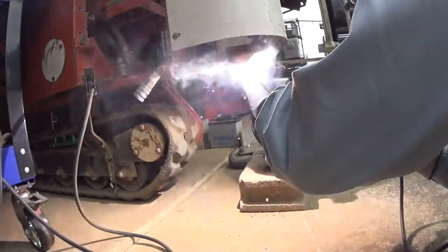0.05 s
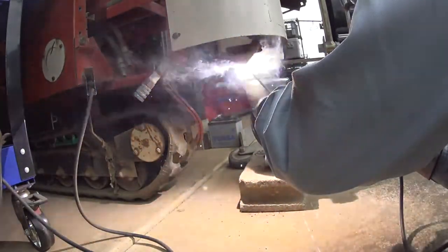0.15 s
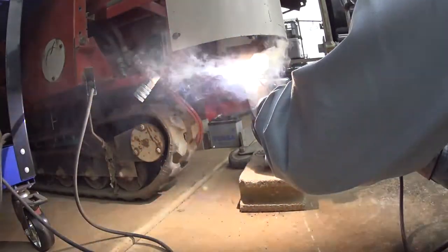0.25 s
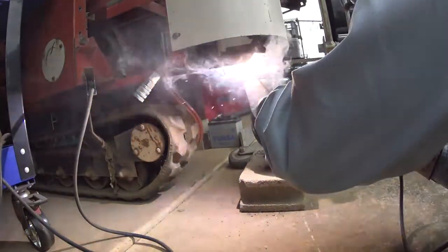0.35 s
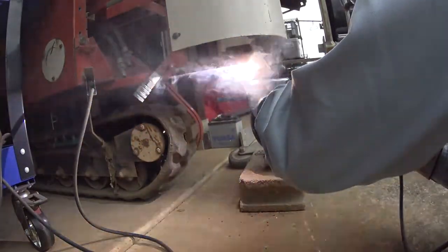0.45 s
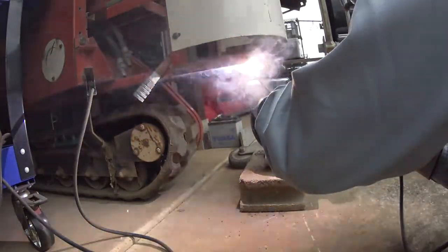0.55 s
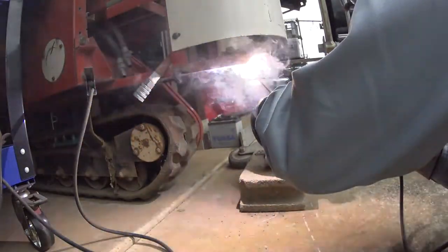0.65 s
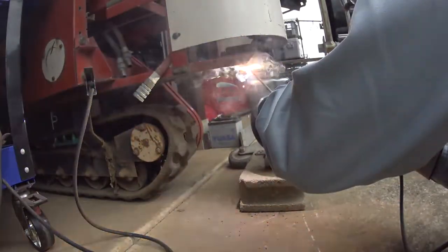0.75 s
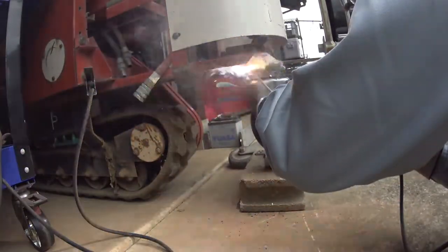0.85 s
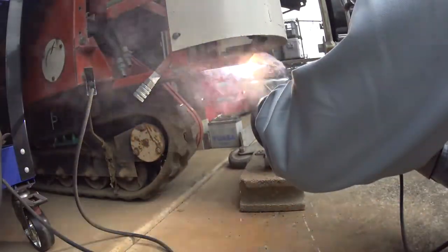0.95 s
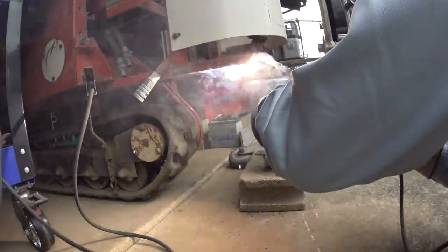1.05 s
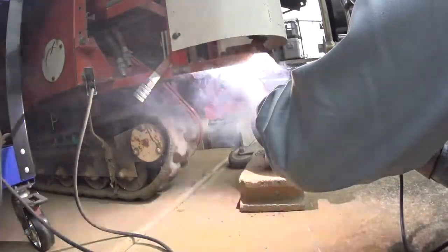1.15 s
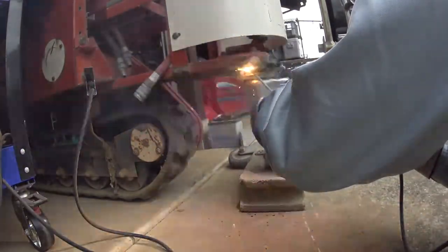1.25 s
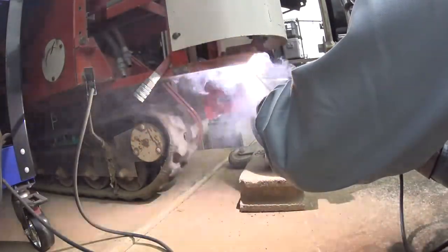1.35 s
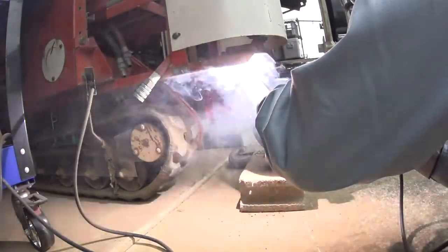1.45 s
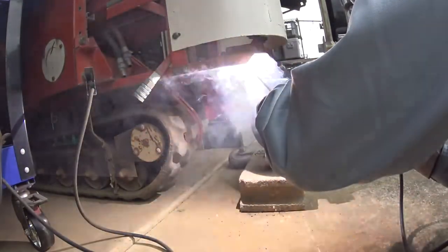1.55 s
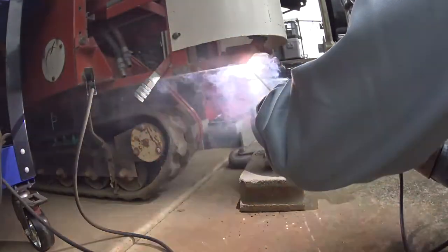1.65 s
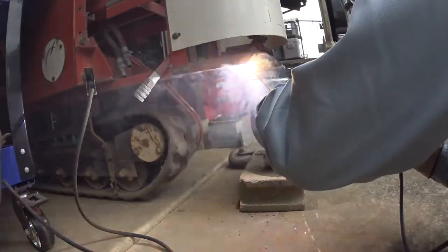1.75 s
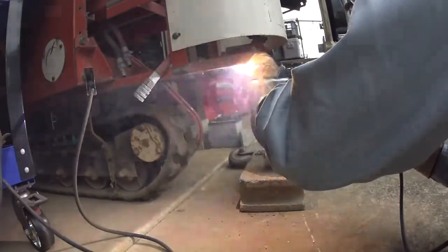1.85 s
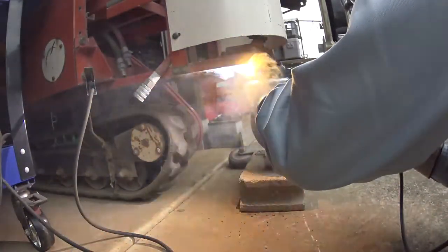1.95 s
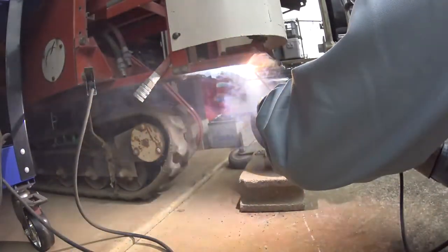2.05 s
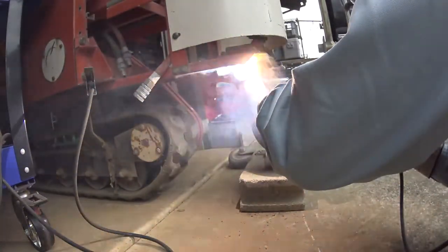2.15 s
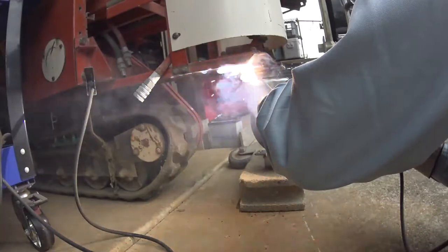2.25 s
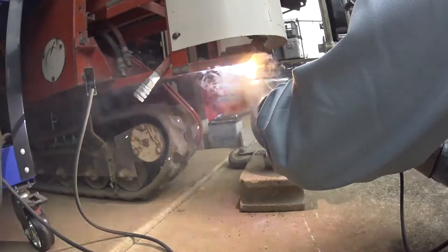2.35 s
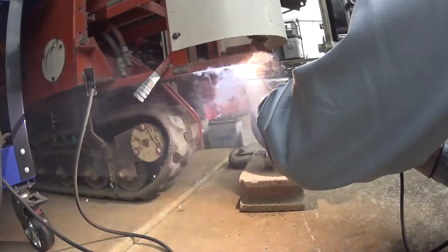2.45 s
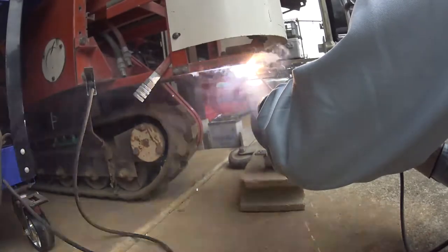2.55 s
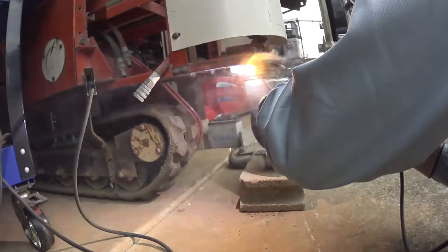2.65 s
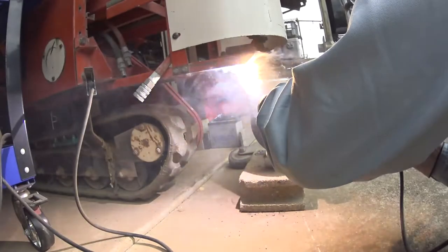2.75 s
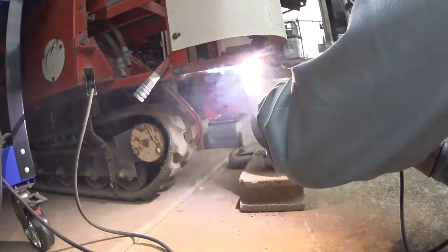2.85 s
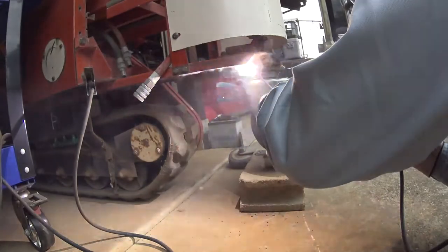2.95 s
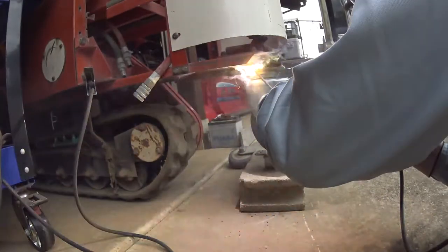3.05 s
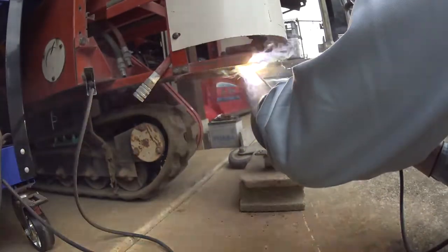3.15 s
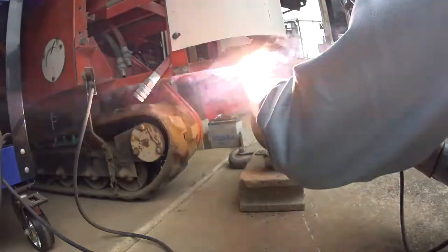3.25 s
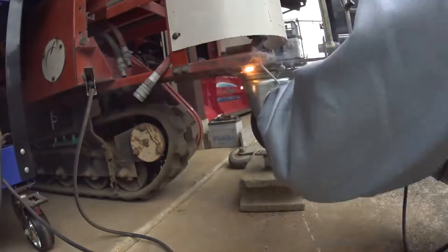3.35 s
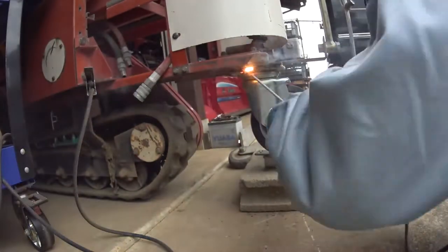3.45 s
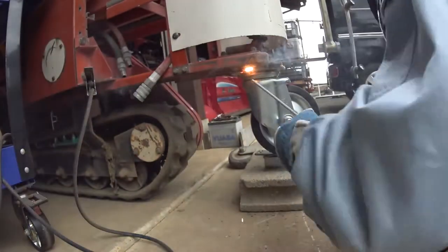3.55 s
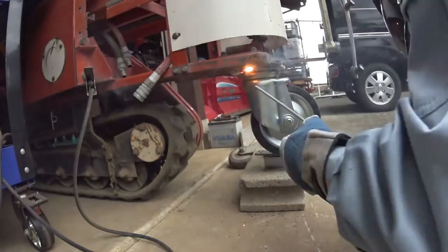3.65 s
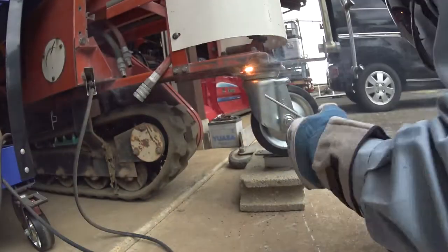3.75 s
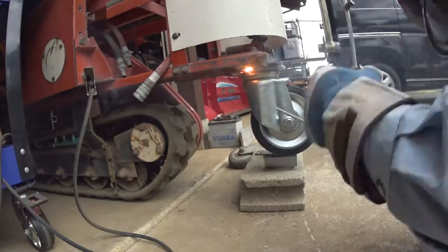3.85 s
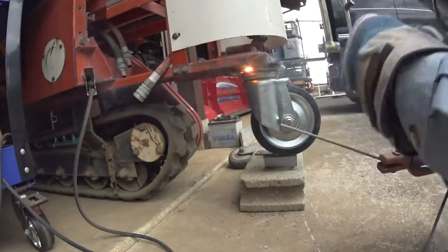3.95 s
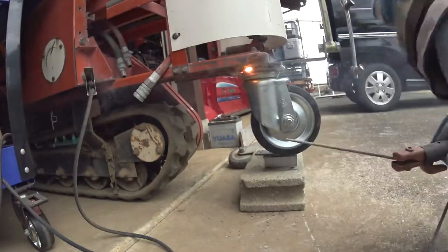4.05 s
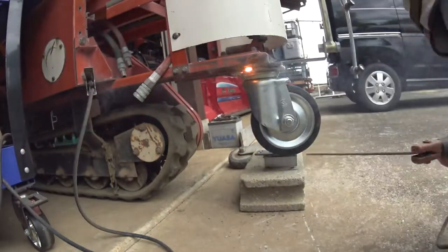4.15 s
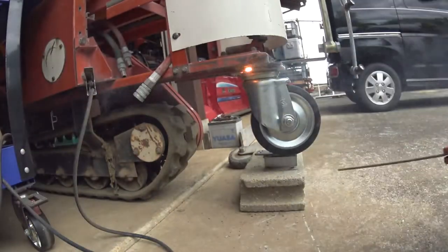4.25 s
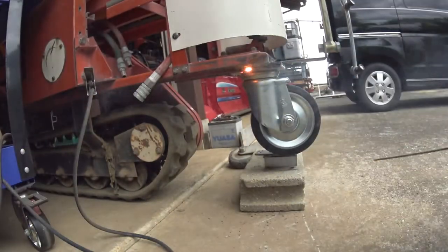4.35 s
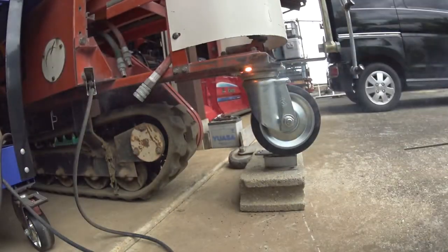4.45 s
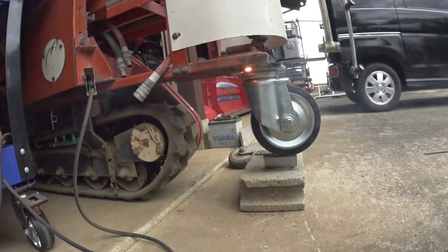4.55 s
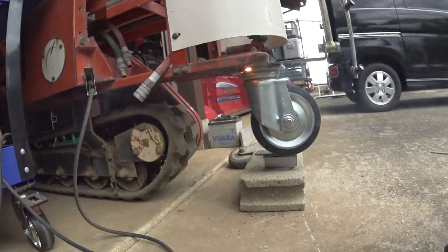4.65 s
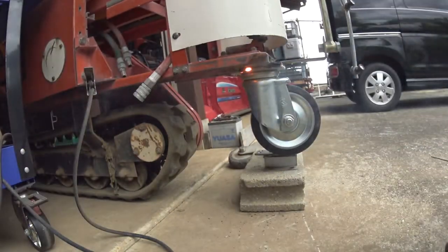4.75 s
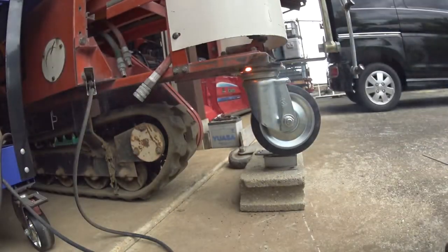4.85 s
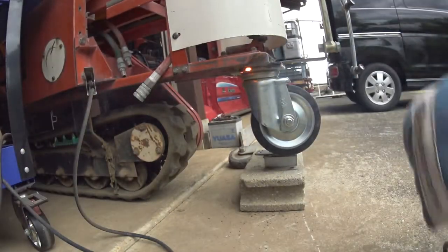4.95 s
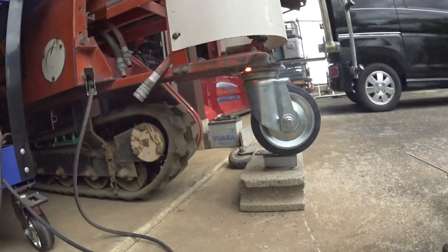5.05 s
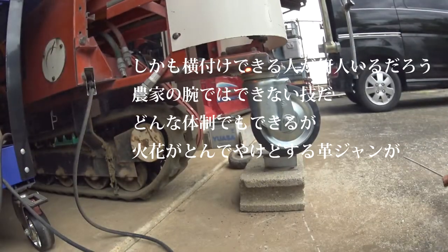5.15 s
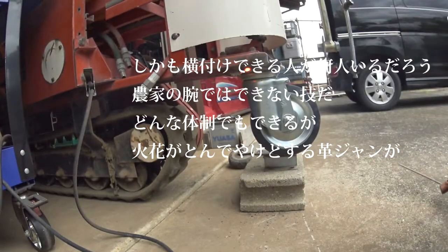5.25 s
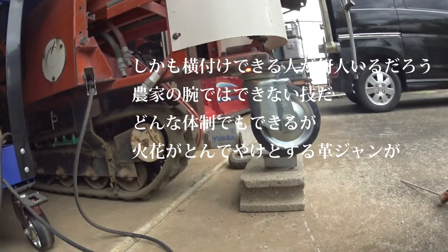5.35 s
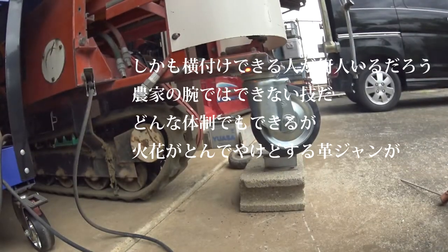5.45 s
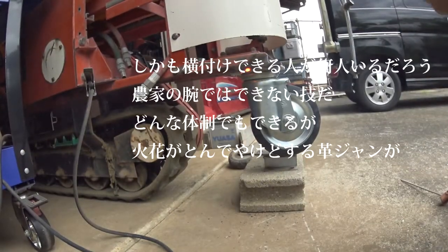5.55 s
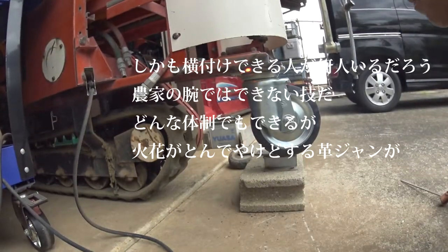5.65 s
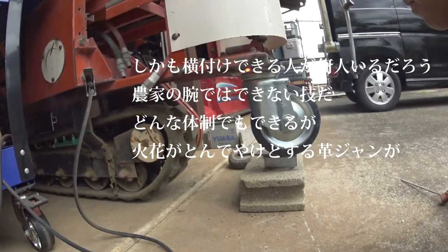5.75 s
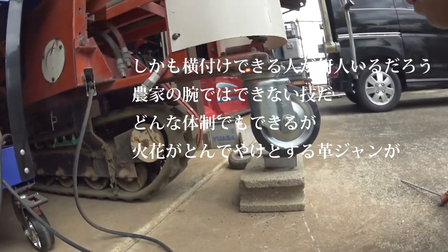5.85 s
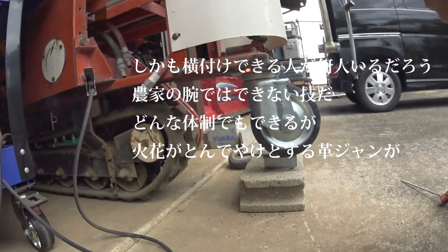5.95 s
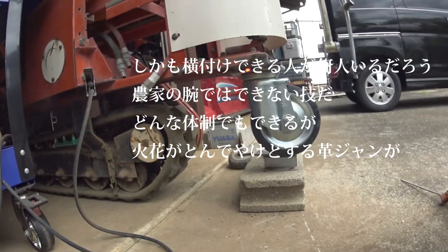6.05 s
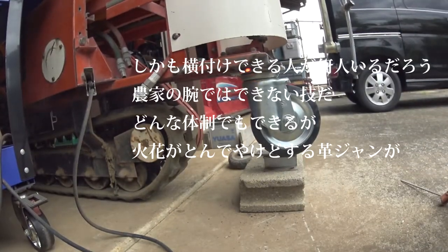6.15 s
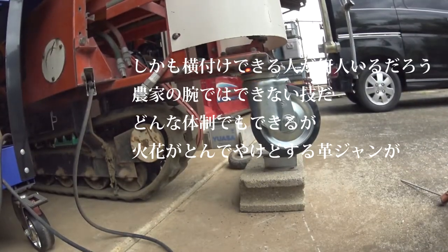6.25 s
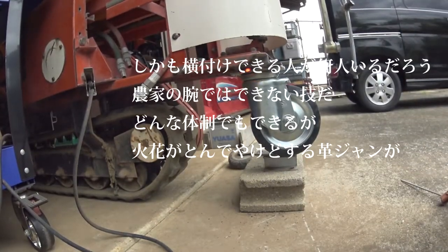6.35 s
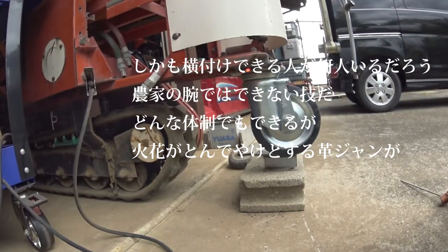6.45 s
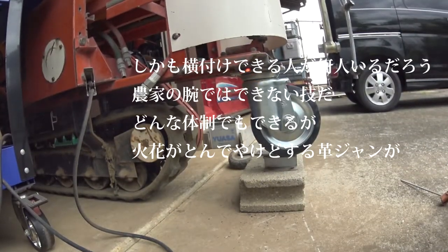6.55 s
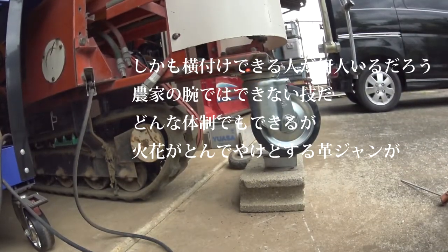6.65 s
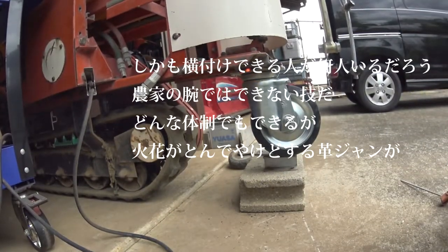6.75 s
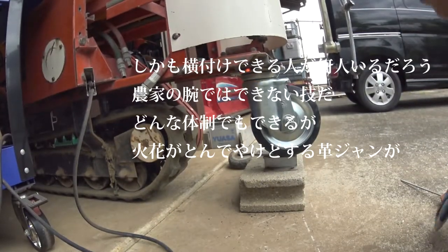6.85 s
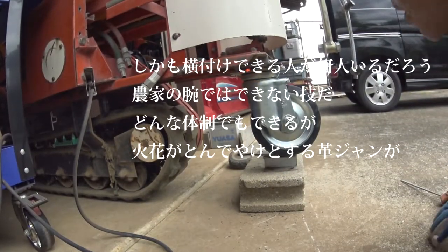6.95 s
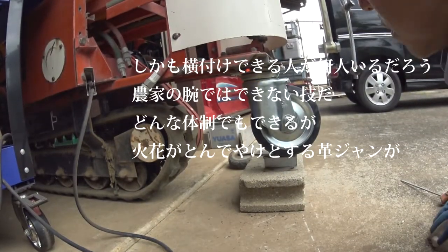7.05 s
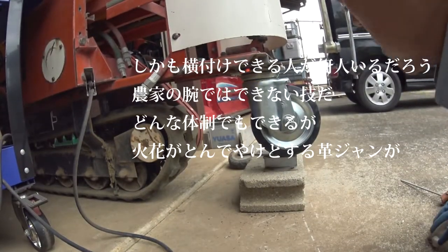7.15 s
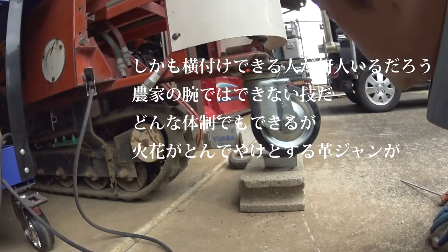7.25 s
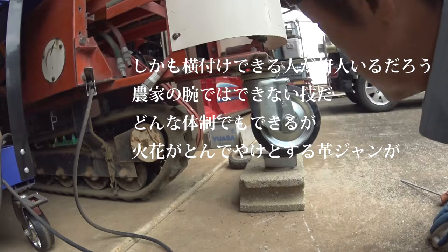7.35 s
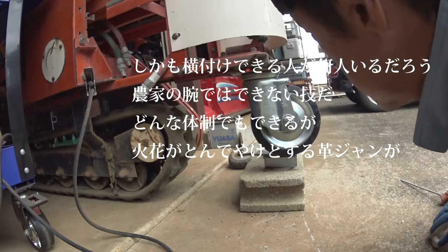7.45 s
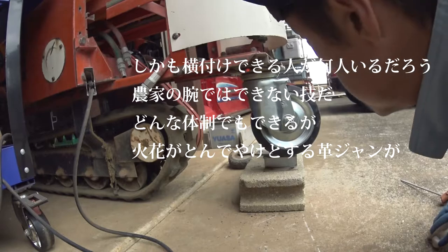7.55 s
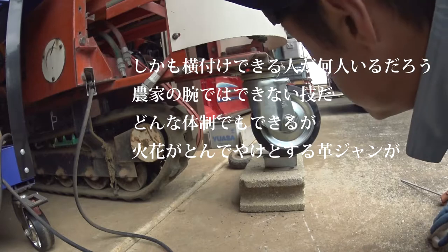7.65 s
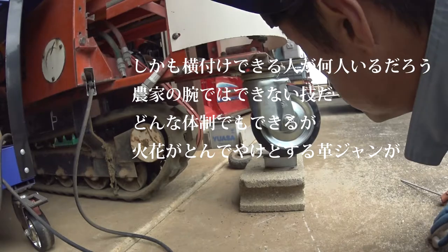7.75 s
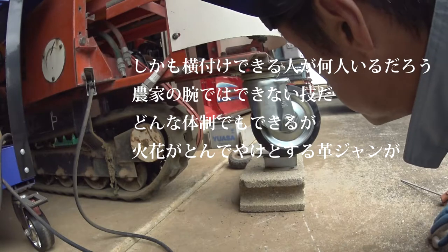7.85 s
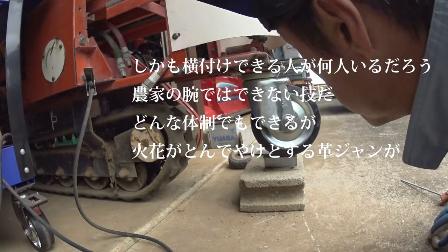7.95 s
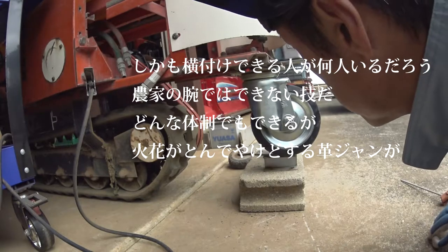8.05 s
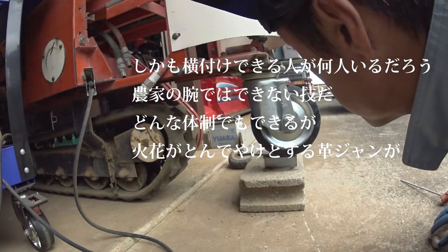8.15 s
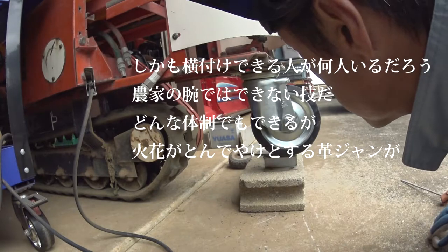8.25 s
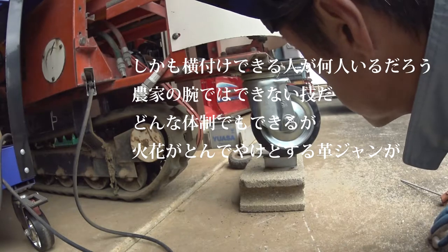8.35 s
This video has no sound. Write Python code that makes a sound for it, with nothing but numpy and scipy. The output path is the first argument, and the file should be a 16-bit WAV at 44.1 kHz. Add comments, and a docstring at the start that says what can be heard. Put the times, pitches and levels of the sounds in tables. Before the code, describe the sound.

From the very start, an electric arc welder crackles on steel close by: a dense, bright fizz with sharp spits, stumbling briefly and often. Underneath, the machine's fan runs throughout, a soft rush of air with a low drone and faint hum, slightly to the left. At about 3.3 seconds the arc cuts out and a faint sizzle quickly fades. Around 4.3 seconds a shoe scuffs on gritty concrete with a quick cluster of small, dull knocks. More scraping comes from 5 to 5.5 seconds, with the soft thud of a knee at 5.1 and the short, bright clink of a thin metal rod hitting the floor at 5.4. Light scuffs and several small taps follow between 6.2 and 6.7 seconds. Then only the fan continues until the end, a little after 8 seconds. The space is a shed with a slight, short reverberation.

```python
"""Stick welding in an open shed

An arc crackles as countless tiny discharges excite a steel frame, stumbles whenever a drop of metal
shorts it, then goes out. The machine's fan drones on: turbulent air with a blade tone. The welder
scuffs over gritty concrete, shifts small things, kneels, and drops the rod, which rings in its modes."""
import sys
import numpy as np
from scipy import signal
from scipy.io import wavfile
from scipy.ndimage import uniform_filter1d

SR = 44100
rng = np.random.default_rng(int(sys.argv[2]) if len(sys.argv) > 2 else 0)


def inscribe(sig):
    """Save sig as 16-bit PCM at rate SR to the path in sys.argv[1].

    A 1-D sig is mono; a 2-D sig holds one channel per row.
    Samples are clipped to [-1, 1] before scaling.
    """
    pcm = np.round(np.clip(np.atleast_2d(sig).T, -1, 1) * 32767)
    wavfile.write(sys.argv[1], SR, pcm.astype(np.int16))


N = 370881
TIME = np.arange(N) / SR


def amp(db):
    """Amplitude ratio of a level in decibels."""
    return 10 ** (np.asarray(db) / 20)


def unit_rms(x):
    """Normalisation to unit power."""
    return x / np.sqrt(np.mean(x ** 2) + 1e-20)


def curve_at(points, hz):
    """Interpolation of a table on a logarithmic frequency axis."""
    freq_hz, value = np.transpose(points)
    return np.interp(np.log(hz + 1), np.log(freq_hz + 1), value)


def add(mix, start_s, sound):
    """Superposition: a sound sums into the mix from its start time."""
    part = mix[round(start_s * SR):][:len(sound)]
    part += sound[:len(part)]


def band(x, low_hz, high_hz, order=2):
    """Maximally flat band-pass filtering."""
    sos = signal.butter(order, [low_hz, min(high_hz, SR / 2.2)], "band", fs=SR, output="sos")
    return signal.sosfilt(sos, x)


def resonate(x, hz, width_hz):
    """Resonance by heterodyning: shift hz down to zero, smooth, and shift back."""
    carrier = np.exp(2j * np.pi * hz * np.arange(1, len(x) + 1) / SR)
    pole = np.exp(-np.pi * width_hz / SR)
    return 2 * (carrier * signal.lfilter([1 - pole], [1, -pole], x / carrier)).real


def modal_spectrum(modes, smooth, hz, valley_db, peak_db):
    """Power summation, in dB: resonance humps, the tallest at peak_db, on a smooth spectrum."""
    top_db = max(db for _, _, db in modes)
    humps = sum(amp(db - top_db + peak_db) ** 2 / (1 + (2 * (hz - centre_hz) / width_hz) ** 2) ** 2
                for centre_hz, width_hz, db in modes)
    return 10 * np.log10(amp(curve_at(smooth, hz) + valley_db) ** 2 + humps)


def minimum_phase(gain_db):
    """Causal impulse response whose phase follows from the log magnitude of its spectrum."""
    log_gain = np.log(amp(np.maximum(gain_db, -100)))
    mirrored = np.concatenate([log_gain, log_gain[-2:0:-1]])
    phase = -signal.hilbert(mirrored).imag
    return np.fft.ifft(np.exp(mirrored + 1j * phase)).real[:len(gain_db)]


def flicker(cutoff_hz):
    """Random modulation: low-passed noise of unit power."""
    sos = signal.butter(2, cutoff_hz, fs=SR, output="sos")
    return unit_rms(signal.sosfilt(sos, rng.standard_normal(N)))


def shot_noise(per_s, spread_db):
    """Shot noise: independent clicks of random sign, a few of them large."""
    fires = rng.random(N) < per_s / SR
    size_db = spread_db * np.minimum(rng.exponential(1, N), 3.5)
    return unit_rms(rng.choice([-1., 1.], N) * amp(size_db) * fires)


# Strength of the arc until it goes out: time_s, level_db, crack_against_fizz_db
ARC_STRENGTH = [(0, -22.5, -8), (.065, -25.5, -7), (.15, -27, -5), (.3, -27.5, -6), (.44, -25.5, -7.5),
                (.62, -27, -6), (.78, -25, -10), (1.1, -24.5, -10), (1.4, -27, -8), (1.55, -29, -2),
                (1.75, -28.5, -7.5), (1.95, -25, -8.5), (2.3, -27.5, -10), (2.38, -22.5, -8.5),
                (2.62, -29, -9), (2.76, -27.5, -6.5), (2.96, -30.5, -3), (3.1, -29, -6), (3.19, -28.5, -9),
                (3.26, -27, -7), (3.29, -24.5, -4)]
# Drops of metal shorting the arc: start_s, choked_s, depth_db, recovery_s
SHORT_CIRCUITS = [(0.016, 0.025, 9.5, 0.012), (.078, 0.026, 10.5, 0.016), (.335, .014, 17.5, 0.03),
                  (.574, 0.0081, 11.5, 0.065), (.785, 0.0076, 8, 0.0061), (0.835, 0.0076, 7.5, 0.055),
                  (0.973, 0.0096, 13.5, 0.041), (1.119, 0.0055, 6, .01), (1.192, 0.008, 6.5, 0.0099),
                  (1.273, 0.015, 13, 0.029), (1.452, .025, 7.5, 0.018), (1.592, 0.013, 7.5, 0.023),
                  (1.645, 0.0069, 8, .01), (1.677, .006, 12.5, 0.063), (1.852, 0.015, 11.5, 0.051),
                  (1.998, 0.01, 8, 0.014), (2.118, 0.0062, 0, 0.0072), (2.299, .008, 11, .045),
                  (2.44, 0.011, 6.5, 0.0089), (2.651, 0.019, 14, 0.026), (3.203, .012, 14.5, 0.038)]


def arc_envelope():
    """Short-circuit transfer: each drop bridges the gap and chokes the arc, which then climbs back."""
    choke_s, restrike_share = 0.0071, 0.71  # time to choke; share of the dip left at the restrike
    time_s, strength_db, _ = np.transpose(ARC_STRENGTH)
    level_db = np.interp(TIME, time_s, strength_db)
    for start_s, choked_s, depth_db, recovery_s in SHORT_CIRCUITS:
        strike_s = start_s + choked_s
        choked = np.clip((TIME - start_s) / choke_s + 1, 0, 1) * (TIME < strike_s)
        recovering = np.sqrt(np.clip(1 - (TIME - strike_s) / recovery_s, 0, 1)) * (TIME >= strike_s)
        level_db -= depth_db * (choked + restrike_share * recovering)
    since_out_s = TIME - time_s[-1]
    pool_sizzle = amp(-48 - 32 * since_out_s)  # the weld pool fades once the arc is out
    return np.where(since_out_s < 0, amp(level_db), pool_sizzle)


# Spits of molten metal: start_s, drive_db, crack_against_fizz_db
SPITS = [(0.0317, -17.5, -9), (0.0644, -12, -21), (0.2057, -21, -18), (0.3504, -18, -11),
         (0.3845, -14, -12), (0.4799, -16, -2), (0.5813, -13, -15), (0.7474, -15, -15), (0.8432, -15, -10),
         (0.981, -19, -16), (1.269, -15, -14), (1.288, -16, -18), (1.3303, -14, -13), (1.481, -16.5, -7),
         (1.5262, -15, -4), (1.6576, -17, -1.5), (1.6825, -18, -12), (1.722, -14.5, -14),
         (1.8464, -20, -20), (1.867, -20, -17), (2.3064, -16.5, -11), (2.67, -16, -28),
         (2.8372, -12.5, -10), (2.8442, -16, -3), (2.854, -17, -11), (2.8928, -17, -1.5),
         (2.9714, -14, -12), (2.9998, -17, -14), (3.05, -20, -10), (3.0715, -13.5, -16.5),
         (3.1078, -21.5, -11), (3.2167, -19.5, -11), (3.258, -23, -20), (3.2854, -17, -11)]


def arc():
    """Impulsive excitation: discharges fizz high and crack lower, surging together with the plasma."""
    envelope, surge = arc_envelope(), flicker(224)
    time_s, _, balance_db = np.transpose(ARC_STRENGTH)
    crack_db = np.interp(TIME, time_s, balance_db)
    fizz = envelope * amp(0.95 * surge + 1.28 * flicker(250))
    fizz *= shot_noise(per_s=9000, spread_db=5.6)
    crack = envelope * amp(crack_db + 2.6 * surge + 0.81 * flicker(71))
    crack *= shot_noise(per_s=6000, spread_db=3.05)
    t, spit_t60_s = np.arange(SR // 10) / SR, 0.0095
    for start_s, drive_db, spit_crack_db in SPITS:
        spit = amp(drive_db - 60 * t / spit_t60_s) * rng.choice([-1., 1.], len(t))
        add(fizz, start_s, spit)
        add(crack, start_s, spit * amp(spit_crack_db))
    return steel_frame(fizz, crack)


# Smooth spectrum of the arc: frequency_hz, relative_density_db
ARC_SPECTRUM = [(180, -39), (300, -22.5), (647, -41.5), (1060, -10.5), (2400, -12), (2710, -14.5),
                (4070, -10.5), (4950, -18), (10000, -3.5), (11000, -10.5), (14300, -32), (22000, -120)]
# Resonances of the steel around the weld: centre_hz, width_hz, relative_db
FRAME_MODES = [(970, 310, -16.5), (1438, 144, -11.5), (2065, 180, -9), (2340, 210, -9.5),
               (3283, 440, -10.5), (4134, 190, -5.5), (4600, 220, -6.5), (5325, 610, -11), (5876, 180, -8),
               (6490, 210, -6), (7020, 210, -6), (7360, 180, -34), (7960, 340, -4.5), (8300, 180, -18),
               (9350, 220, -5.5), (9300, 560, -4), (10120, 360, 2.5), (10500, 220, -6.5),
               (10980, 146, -4.5)]
# Level difference of the arc between the ears: frequency_hz, left_minus_right_db
ARC_BALANCE = [(60, 16), (170, 23), (490, 4), (1400, 1), (3990, -2), (11400, 0)]


def steel_frame(fizz, crack):
    """Modal response depends on the driving point: the arc root wanders between two spots on the steel."""
    hz, crossover_hz = np.fft.rfftfreq(4096, 1 / SR), 5210
    crack_share = 1 / (1 + (hz / crossover_hz) ** 8)
    lean_db = curve_at(ARC_BALANCE, hz) / 2
    wander = (1 + np.tanh(flicker(25))) / 2
    favour_db = 2.67 * rng.choice([-1., 1.], len(FRAME_MODES))  # one spot's gain is the other's loss
    ears = np.zeros((2, N))
    for spot_weight, shifts_db in ((wander, favour_db), (1 - wander, -favour_db)):
        modes = [(f, width, db + shift) for (f, width, db), shift in zip(FRAME_MODES, shifts_db)]
        colour_db = modal_spectrum(modes, ARC_SPECTRUM, hz, valley_db=-3, peak_db=3.5)
        for drive, power_share in ((fizz, 1 - crack_share), (crack, crack_share)):
            gain_db = colour_db + 10 * np.log10(power_share + 1e-9)
            response = np.array([minimum_phase(gain_db + lean_db), minimum_phase(gain_db - lean_db)])
            response /= np.linalg.norm(minimum_phase(gain_db))
            ears += signal.oaconvolve((spot_weight * drive)[None], response, axes=1)[:, :N]
    return ears


# Smooth spectrum of the rushing air: frequency_hz, relative_density_db
AIR_SPECTRUM = [(15, -51.5), (25, -22.5), (141, -13.5), (207, 0.5), (254, -11), (353, -7.5), (381, -13.5),
                (588, -14.5), (651, -15), (798, -14), (1760, -18), (3770, -21.5), (11000, -32.5),
                (14300, -71), (22000, -120)]
# Resonances of the machine's casing: centre_hz, width_hz, relative_db
CASING_MODES = [(219, 22, -6.5), (571.4, 24, -8), (907, 11, -6), (2846, 10.5, -10), (3090, 62, -20),
                (3820, 130, -17)]
# Likeness of the air noise at the two ears: frequency_hz, coherence_ratio
AIR_COHERENCE = [(60, 0.9), (170, 0.99), (490, 0.93), (1400, 0.27), (3990, 0.65), (11400, 0.76)]
# Level difference between the ears: frequency_hz, left_minus_right_db
AIR_BALANCE = [(60, 0.5), (170, 1.7), (490, 3.8), (1400, 5.8), (3990, 1.5), (11400, 0.57)]
# Phase difference between the ears: frequency_hz, left_lead_rad
AIR_PHASE = [(0, 0), (780, 0.36), (1640, -0.051), (2150, -0.67), (2840, -0.92), (6720, 0.49), (11500, 0.99)]


def fan_air():
    """Turbulence: broadband noise, coloured by the casing and partly coherent between the ears."""
    size, hop, level_db = 2048, 512, -42
    frames, hz = N // hop + 5, np.fft.rfftfreq(size, 1 / SR)
    left_re, left_im, apart_re, apart_im, patches = rng.standard_normal((frames, len(hz), 5)).T
    left, apart = left_re + 1j * left_im, apart_re + 1j * apart_im
    coherence = np.clip(curve_at(AIR_COHERENCE, hz), -1, 1)[:, None]
    lag = np.exp(-1j * curve_at(AIR_PHASE, hz))[:, None]
    right = coherence * left * lag + np.sqrt(1 - coherence ** 2) * apart
    lean = amp(curve_at(AIR_BALANCE, hz) / 2)[:, None]
    patches = uniform_filter1d(patches, size=16, axis=0)  # level drifts in patches of frequency and time
    patches_db = 0.8 * unit_rms(uniform_filter1d(patches, size=8, axis=1))
    gust = flicker(12.5)[np.minimum(np.arange(frames) * hop, N - 1)]
    gust_db = 2 * gust / (1 + hz[:, None] / 1700)  # the bass heaves together
    colour_db = modal_spectrum(CASING_MODES, AIR_SPECTRUM, hz, valley_db=3.5, peak_db=-1)
    spectra = np.array([left * lean, right / lean]) * amp(colour_db[:, None] + patches_db + gust_db)
    _, air = signal.istft(spectra, nperseg=size, noverlap=size - hop)
    return amp(level_db) * unit_rms(air[:, :N])


# Partials of the blade tone: harmonic_number, relative_db
BLADE_HARMONICS = [(1, -1.5), (2, -13), (3, -10), (4, -9.5)]


def fan_blades():
    """Periodic forcing: passing blades make a harmonic tone that wavers in pitch and level."""
    blade_hz, level_db = 349.6, -55
    cycles = np.cumsum(blade_hz * (1 + 0.002285 * flicker(4.06))) / SR
    tone = sum(amp(db + 2.26 * flicker(5.2)) * np.sqrt(2) * np.sin(2 * np.pi * harmonic * cycles)
               for harmonic, db in BLADE_HARMONICS)
    return tone * amp(level_db) * amp([[1.5], [-1.5]])  # a little to the left


# Shoes and cloth dragging: start_s, loudest_s, end_s, scrape_db, grit_against_scrape_db, hollow_hz
SCUFFS = [(4.312, 4.37, 4.52, -33.5, -1, 815), (5.023, 5.148, 5.3, -41.5, -3, 744),
          (5.2, 5.302, 5.46, -39.5, -3, 1060), (6.165, 6.229, 6.29, -41, -5, 900),
          (6.472, 6.514, 6.57, -45.5, 0.5, 1230), (6.597, 6.623, 6.68, -43.5, -2, 1250)]


def scuffs():
    """Sliding friction on gritty concrete: clumped grain impacts give a hollow scrape and fine grit."""
    grains = shot_noise(per_s=12000, spread_db=1) * amp(0.86 * flicker(120))
    grit = unit_rms(band(grains, 1600, 8700, order=1))
    out, ends_db = np.zeros(N), -16.5
    for start_s, loudest_s, end_s, scrape_db, grit_db, hollow_hz in SCUFFS:
        span = slice(round(start_s * SR), round(end_s * SR))
        hollow = resonate(grains[span], hollow_hz, width_hz=650)
        scrape = unit_rms(band(hollow, 240, 6100))
        swell_db = np.interp(TIME[span], [start_s, loudest_s, end_s], [ends_db, 0, ends_db])
        envelope = amp(scrape_db + swell_db) * signal.windows.tukey(len(scrape), .15)
        out[span] += envelope * (scrape + amp(grit_db) * grit[span])
    return out


# Small things being shifted: start_s, level_db, pitch_hz, relative_treble_db
KNOCKS = [(4.343, -32, 816, -22), (4.356, -23.5, 720, -25), (4.384, -24, 826, -20),
          (4.401, -24.5, 800, -28), (4.446, -32, 910, -23), (5.298, -41, 920, -21), (6.253, -36, 929, -4),
          (6.387, -28, 1480, -20), (6.483, -37, 883, 1.5), (6.512, -27.5, 1530, -2),
          (6.621, -28, 1620, -9.5), (6.647, -35, 1730, -2)]


def knocks():
    """Heavily damped impacts: a pitched snap dies quickly inside a brief noisy rattle."""
    out, t, t60_s = np.zeros(N), np.arange(SR // 5) / SR, 0.032
    decay = amp(-60 * t / t60_s)
    for start_s, level_db, pitch_hz, treble_db in KNOCKS:
        noise = rng.standard_normal(len(t))
        snap = np.sin(2 * np.pi * pitch_hz * t) * amp(-60 * t / (0.38 * t60_s))
        rattle = unit_rms(band(noise, pitch_hz / 2.9, pitch_hz * 3.1)) * decay
        treble = unit_rms(band(noise, 4400, 16000)) * decay
        add(out, start_s, amp(level_db) * (1.25 * snap + 0.52 * rattle + amp(treble_db) * treble))
    return out


# A knee landing, as a tap, its body and a settling: start_s, pitch_hz, level_db, rise_s
KNEE_PULSES = [(5.1367, 540, -21.5, .0028), (5.1405, 150, -22, .006), (5.151, 320, -31, .007),
               (5.15, 80, -36, .011)]


def knee_thud():
    """Soft impact: a yielding contact builds gradually, so it gives only brief low tones."""
    out, t = np.zeros(N), np.arange(SR // 5) / SR
    for start_s, pitch_hz, level_db, rise_s in KNEE_PULSES:
        envelope = (t / rise_s * np.exp(1 - t / rise_s)) ** 2
        add(out, start_s, amp(level_db) * envelope * np.sin(2 * np.pi * pitch_hz * t))
    return out


# The rod striking the floor: start_s, level_db, dullness_db_per_octave
ROD_HITS = [(5.3775, -11.5, 0), (5.384, -14, 0), (5.4115, -24.5, 2)]
# Modes of the rod: pitch_hz, relative_db, t60_s
ROD_MODES = [(2498, -18, .03), (2900, -19, .03), (3871, 0, .032), (4500, -8, .025), (5351, -8, .02),
             (5782, -8, .02), (6670, -7, .022), (7600, -9, .02), (8667, -7, .02), (9458, 4, .017),
             (10680, -6, .015)]


def dropped_rod():
    """Free vibration of a bar: chatter against the concrete excites the rod's inharmonic modes."""
    out, t = np.zeros(N), np.arange(SR // 5) / SR
    chatter_t60_s, hiss_t60_s = .015, .065
    for start_s, level_db, dullness in ROD_HITS:
        ring = sum(amp(db - dullness * np.log2(hz / 4000) - 60 * t / t60_s) * np.sin(2 * np.pi * hz * t)
                   for hz, db, t60_s in ROD_MODES)
        chatter = rng.standard_normal(len(t)) * amp(-60 * t / chatter_t60_s)
        chatter *= rng.random(len(t)) < .15  # contact is intermittent
        chatter[0] = 2.5  # the first blow
        clink = band(signal.fftconvolve(chatter, ring)[:len(t)], 2300, 15000, order=3)
        hiss = band(rng.standard_normal(len(t)), 2800, 10800, order=3) * amp(-60 * t / hiss_t60_s)
        add(out, start_s, amp(level_db) * (clink / abs(clink).max() + .27 * hiss))
    return out


# Reverberation time of the shed: frequency_hz, t60_s
SHED_DECAY = [(500, 0.17), (2000, 0.19), (6000, 0.37), (11000, 0.12)]


def shed(x):
    """Reverberation: sparse reflections, different at each ear, decay at a rate set by frequency."""
    reflections = np.zeros((2, SR // 2))
    slots = np.arange(130, SR // 2 - 20, 20)  # one reflection in every 20 samples
    arrivals = slots + rng.integers(0, 20, (2, len(slots)))
    np.put_along_axis(reflections, arrivals, rng.choice([-1., 1.], arrivals.shape), 1)
    hz, t, spectra = signal.stft(reflections, SR, nperseg=128)
    decay = amp(-60 * t / curve_at(SHED_DECAY, hz)[:, None])
    _, tail = signal.istft(spectra * decay, SR, nperseg=128)
    return signal.fftconvolve(x[None], tail / np.linalg.norm(tail[0]), axes=1)[:, :N]


def scene():
    """Superposition: the arc and the movements, their reverberation in the shed, and the fan."""
    weld = arc()
    movements = scuffs() + knocks() + knee_thud() + dropped_rod()
    direct = weld + movements * amp([[-.3], [.3]])  # the welder is slightly to the right
    reverberation = amp(-13) * (shed(movements) + shed(weld.mean(0)))
    return direct + reverberation + fan_air() + fan_blades()


def record(dry):
    """Band limiting: a steep linear-phase low-pass removes the highest treble."""
    cutoff_hz = 11035
    lowpass = signal.firwin(2047, cutoff_hz, window=("kaiser", 7), fs=SR)
    return signal.oaconvolve(dry, lowpass[None], "same")


dry = scene()
out = record(dry)
inscribe(out)
```